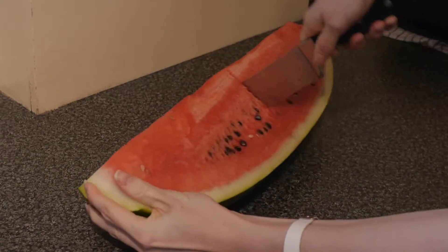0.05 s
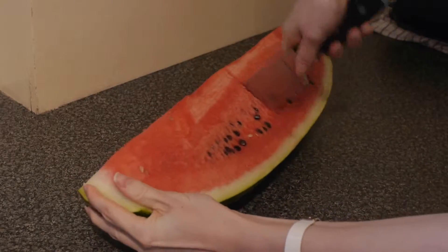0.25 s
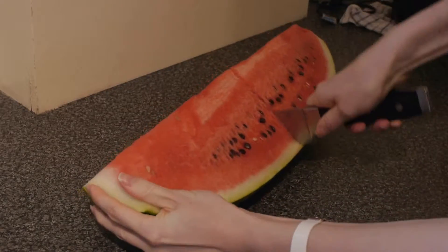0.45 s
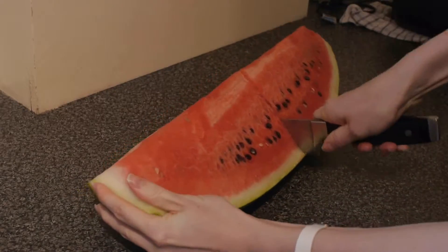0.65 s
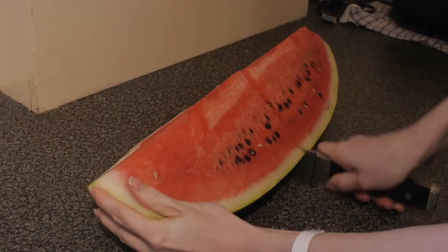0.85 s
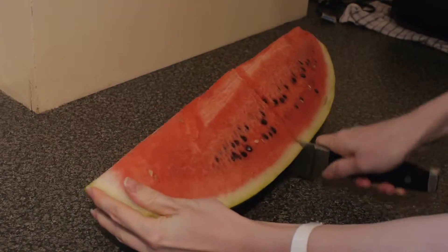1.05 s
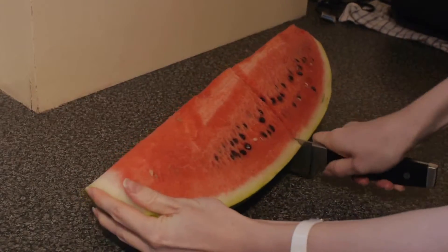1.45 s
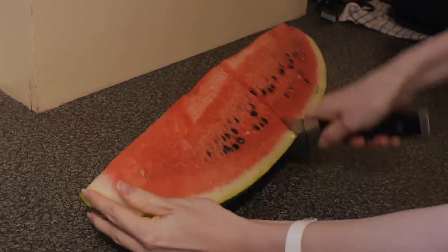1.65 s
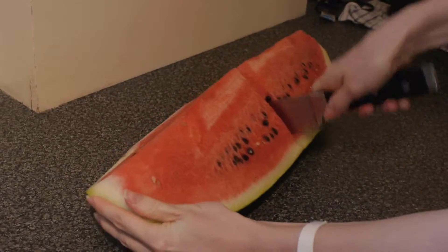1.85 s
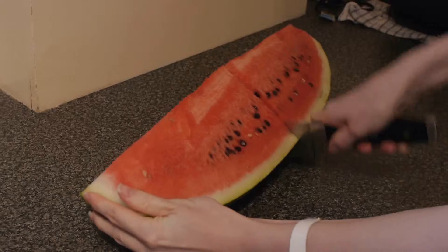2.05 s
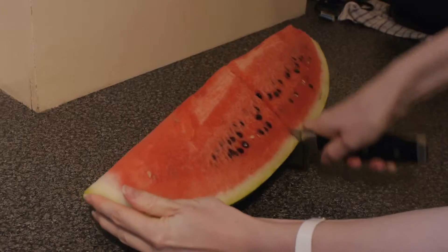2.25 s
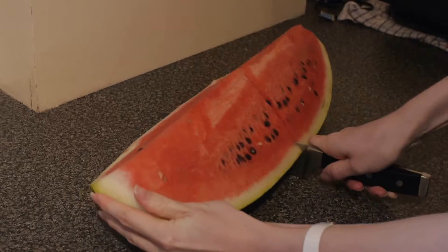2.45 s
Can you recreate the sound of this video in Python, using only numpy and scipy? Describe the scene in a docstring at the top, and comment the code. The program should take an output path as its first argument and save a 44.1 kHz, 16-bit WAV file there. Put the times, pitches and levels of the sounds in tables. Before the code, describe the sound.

Knife slicing a watermelon wedge, its rind cracking with hollow knocks in an echoing room.

```python
"""In a bare, echoing room, a big knife is worked through a watermelon wedge on the carpet.
Cells of the wet flesh burst under the blade, and their impulses merge into short hisses.
The rind snaps, with one faint wall echo just after the loudest snaps. Each time the blade breaks
through, it excites the wedge's damped modes: a hollow thud that rings on in the room."""
import sys
import numpy as np
from scipy import signal
from scipy.fft import rfft, irfft
from scipy.io import wavfile
from scipy.ndimage import uniform_filter1d

SR = 44100
rng = np.random.default_rng(int(sys.argv[2]) if len(sys.argv) > 2 else 0)


def store_pcm(level_fs):
    """Save levels as 16-bit WAV."""
    pcm = np.round(np.clip(level_fs, -1, 1) * 32767).astype(np.int16)
    wavfile.write(sys.argv[1], SR, np.atleast_2d(pcm).T)


N = 110250
HZ = np.maximum(np.fft.rfftfreq(N, 1 / SR), 1)
T = np.arange(N) / SR

# air noise: (frequency [Hz], level [dB])
AIR_SPECTRUM = [(25, -14.5), (60, -15.5), (160, -14), (235, 3.5), (310, -7), (550, 4), (1000, 1),
                (1800, -1), (3500, -3), (8000, -4.5), (15000, -16)]
# blade strokes: (peak time [s], rise [s], fall [s], level [dB], tilt [dB/octave])
STROKES = [(.02, 0.035, 0.011, -56, 1), (0.07, 0.015, 0.0065, -43, -0.6), (.125, 0.03, 0.023, -56, 3),
           (0.19, 0.021, 0.0091, -35.5, -0.5), (0.404, 0.055, 0.033, -36, -1),
           (0.543, 0.018, 0.0088, -45, 0.5), (.635, 0.08, .035, -57, -5.5), (.708, .014, 0.023, -31, -0.2),
           (.745, 0.034, 0.039, -34, 1), (0.826, 0.013, 0.03, -25, 1.5), (1.029, 0.057, 0.048, -83, 11),
           (1.161, .02, 0.024, -90, 5), (1.241, 0.049, 0.024, -60.5, 3.5), (1.389, 0.046, 0.012, -52, 1.5),
           (1.612, 0.0096, 0.013, -49.5, 1), (1.64, .015, 0.013, -48.5, 1.5),
           (1.745, 0.048, 0.011, -54.5, 3), (1.855, 0.01, 0.013, -55, 15.5),
           (1.944, 0.0094, 0.018, -45.5, 1.8), (1.98, 0.015, 0.0092, -45, 0.5),
           (2.02, 0.021, 0.057, -50.5, 3), (2.062, 0.011, 0.0063, -32.5, 1.1),
           (2.213, 0.021, 0.013, -43.5, 1.5), (2.253, 0.011, 0.02, -42, .3),
           (2.365, 0.056, 0.016, -56, -5.5), (2.465, 0.026, 0.015, -56, 2)]
# wet flesh parting: (frequency [Hz], level [dB])
FLESH_SPECTRUM = [(40, -54.5), (110, -18.5), (190, -13), (260, -3), (500, 2.5), (800, -0.5), (1150, -1.5),
                  (1800, -2.5), (3000, -4), (4500, -3), (7000, -8.5), (11000, -7), (15000, -15)]
# rind snaps, and one faint wall echo just after the loudest: (time [s], level [dB], tilt [dB/octave])
SNAPS_AND_ECHO = [(0.181, -27, 14), (0.211, -3, -19), (0.2145, 7, 1.5), (0.2183, 9, 7.5), (0.2208, 2, 5.5),
                  (0.2312, -44, 5), (0.7108, -5.5, 9), (.7873, -12.5, -10), (1.6414, -33.5, -1),
                  (1.9385, -25, -4.5), (2.0421, -25, -5), (2.0534, -14, -5), (2.0641, -18, -7),
                  (2.4587, -30, 8)]
# colour of a snap: (frequency [Hz], level [dB])
RIND_SPECTRUM = [(100, -23.5), (500, -20), (1500, -13), (2900, -8.5), (4200, -2), (5500, 4), (7200, 4.5),
                 (9500, 0), (11500, -2.5), (13500, -5.5), (15500, -19.5)]
# blows to the wedge: (time [s], level [dB], boom [Hz], boom gain [dB], cutoff [Hz], bass gain [dB])
THUDS = [(.2142, 5, 506, 9, 1880, -5.5), (.2232, -13.5, 452, 13, 1250, -6), (0.867, 2.5, 520, 8, 1940, -4),
         (.8755, 6, 494, 3, 1530, -9.5), (1.6932, -21, 510, 5.5, 2070, -14),
         (1.7028, -16, 520, 11, 1050, -13), (1.737, -26, 503, 3, 1880, -20),
         (2.0641, 6.5, 772, 8.5, 2560, -11.5)]
# damped modes of the wedge: (frequency [Hz], bandwidth [Hz], level [dB])
WEDGE_MODES = [(278.8, 20.3, 3), (431, 84, -4.5), (538, 123, 2), (777, 150, 0.5), (984, 71, 1),
               (1418, 72, 0), (1728, 600, -2), (2025, 160, -9.5), (2360, 160, -5), (3900, 314, 13.5)]
# reverberation time: (frequency [Hz], T60 [s])
ROOM_T60 = [(150, 0.76), (400, 0.36), (750, 0.5), (1200, 0.4), (2800, 0.4), (7000, 0.43), (14000, 0.3)]
# diffuse tail: (frequency [Hz], level [dB])
TAIL_SPECTRUM = [(100, -12.5), (400, 3.5), (1000, 4.5), (3000, 5), (8000, 3), (15000, 1)]
# early reflections: (delay [s], gain [ratio])
REFLECTIONS = [(.0013, .3), (.0023, .3), (.006, .3), (.0093, .75), (.0175, .25), (.0255, .3), (.038, .3),
               (.0495, .3)]
# standing waves of the room: (frequency [Hz], level [dB])
ROOM_MODES = [(261, -62), (432, -69.5), (537, -64), (590, -56), (720, -59.5), (749, -50.5), (826, -56),
              (1033, -56), (1379, -64), (1873, -72.5)]
# side relative to mid in diffuse sound: (frequency [Hz], level [dB])
STEREO_WIDTH = [(40, 0), (70, -20), (130, -2), (260, -23.5), (500, -17), (1000, -10), (2000, -2),
                (4000, -1), (12000, 0)]


def amp(db):
    """Amplitude ratio of a level in decibels."""
    return 10 ** (np.asarray(db) / 20)


def curve(points, hz=HZ):
    """Interpolation on a logarithmic frequency axis."""
    f, value = np.transpose(points)
    return np.interp(np.log(hz + 1), np.log(f), value)


def tilted(spectrum, db_per_octave, from_hz=880):
    """Spectral tilt: a gain curve with an added slope above from_hz."""
    return amp(curve(spectrum) + db_per_octave * np.log2(np.maximum(HZ, from_hz)))


def unit(x):
    """Normalisation to an rms of 1."""
    return x / np.sqrt(np.mean(abs(x) ** 2) + 1e-20)


def add(mix, time, sound):
    """Superposition of a sound on the mix, from the given time."""
    part = mix[max(round(time * SR), 0):][:len(sound)]
    part += sound[:len(part)]


def ring(gain, size=4096):
    """Minimum phase: folding the cepstrum gives a causal impulse response of this spectral shape."""
    log_gain = np.log(np.maximum(unit(gain), 1e-5))
    cepstrum = irfft(log_gain, N)
    cepstrum[1:N // 2] *= 2
    cepstrum[N // 2 + 1:] = 0
    return irfft(np.exp(rfft(cepstrum)), N)[:size]


def whiten(spectra, band_hz):
    """Whitening: division by the rms of the surrounding band evens out the colour."""
    power = uniform_filter1d(abs(spectra) ** 2, int(band_hz * N / SR), axis=-1)
    return spectra / np.sqrt(abs(power) + 1e-20)


def diffuse_pair(mid, side):
    """Partial coherence: two independent spectra mix into the left and right of a diffuse field."""
    width = amp(curve(STEREO_WIDTH))
    return np.array([mid + width * side, mid - width * side]) / np.sqrt(1 + width ** 2)


def room_tone(level_db=-62.5):
    """Stationary noise: the faint, diffuse sound of the air."""
    noise = diffuse_pair(*rfft(rng.standard_normal((2, N))))
    return amp(level_db) * unit(irfft(noise * amp(curve(AIR_SPECTRUM)), N))


def flesh_hiss(cells_per_s=9000, spread_db=4):
    """Shot noise: cells burst densely under the blade while each stroke swells and fades."""
    out = np.zeros(N)
    for peak, rise, fall, db, tilt in STROKES:
        sizes = amp(spread_db * np.minimum(rng.exponential(1, N), 4))
        signs = rng.choice([-1, 1], N)
        bursts = unit(sizes * signs * (rng.random(N) < cells_per_s / SR))
        swell = np.exp(-.5 * ((T - peak) / np.where(T < peak, rise, fall)) ** 2)
        colour = ring(tilted(FLESH_SPECTRUM, tilt))
        out += amp(db - 7) * signal.oaconvolve(bursts * swell, colour)[:N]
    return out


def rind_snaps_and_echo(places=3, decay_s=.0004, size=512):
    """Broadband transients: the rind snaps at a few places in turn; one faint burst is a wall echo."""
    out = np.zeros((places, N))
    envelope = np.exp(-T[:size] / decay_s)
    for k, (time, db, tilt) in enumerate(SNAPS_AND_ECHO):
        burst = rng.standard_normal(size)
        for _ in range(3):  # shorten the burst, then flatten its spectrum
            phase = np.angle(rfft(burst * envelope))
            burst = irfft(np.exp(1j * phase))
        colour = ring(tilted(RIND_SPECTRUM, tilt) / (1 + (250 / HZ) ** 2))  # bass cut
        add(out[k % places], time, amp(db) * np.convolve(burst[:size // 2], colour))
    return out


def wedge_thuds(low_cut_hz=151, boom_octaves=.23, cutoff_order=9.8, push_period_s=.018):
    """Modal resonance: each blow rings the wedge, with its own bandwidth and the boom of its place."""
    out = np.zeros(N)
    power = sum(amp(db) ** 2 / (1 + (2 * (HZ - hz) / width) ** 2) for hz, width, db in WEDGE_MODES)
    body = np.sqrt(power / (1 + (low_cut_hz / HZ) ** 4)) + amp(-55)
    body *= amp(-7 * np.exp(-((HZ - 1193) / 76) ** 2))  # dip between lower and upper modes
    for time, db, boom_hz, boom_db, cutoff_hz, bass_db in THUDS:
        boom = amp(boom_db * np.exp(-.5 * (np.log2(HZ / boom_hz) / boom_octaves) ** 2))
        bass_shelf = amp(bass_db / (1 + (HZ / 194) ** 4))
        lowpass = 1 / np.sqrt(1 + (HZ / cutoff_hz) ** (2 * cutoff_order))
        add(out, time, amp(db) * ring(body * boom * bass_shelf * lowpass))
    # the first break pushes the wedge against the floor
    half_cycles = 2 * T / push_period_s
    push = np.sin(np.pi * half_cycles) * np.exp(-half_cycles)
    add(out, .215, amp(-48.5) * push)
    return out


def room(source, build_s=.0013, wall_cutoff_hz=4730, stereo_lag_s=14e-6):
    """Reverberation: early reflections, a diffuse tail and standing waves join the direct sound."""
    bands, times, noise = signal.stft(rng.choice([-1., 1.], (2, N)), SR, nperseg=256)
    decay = amp(-60 * times / curve(ROOM_T60, bands)[:, None])
    tails = signal.istft(noise * decay, SR, nperseg=256)[1][:, :N]
    tails *= 1 - np.exp(-T / build_s)
    diffuse = diffuse_pair(*whiten(rfft(tails), band_hz=97)) * amp(curve(TAIL_SPECTRUM))
    early = sum(gain * np.exp(-2j * np.pi * HZ * delay) for delay, gain in REFLECTIONS)
    early /= (1 + 1j * HZ / wall_cutoff_hz) ** 2
    standing = sum(amp(db - 60 * T / curve(ROOM_T60, hz)) * np.sin(2 * np.pi * hz * T)
                   for hz, db in ROOM_MODES)
    response = irfft(1 + early + diffuse, N) + standing
    lag = np.exp(np.array([[-1j], [1j]]) * np.pi * HZ * stereo_lag_s)  # left trails right
    direct = irfft(rfft(source) * lag, N)
    return signal.fftconvolve(direct, response[:, :SR], axes=1)[:, :N]


def scene():
    """Superposition: each place on the wedge excites its own diffuse tail, over the room tone."""
    sources = [flesh_hiss(), wedge_thuds(), *rind_snaps_and_echo()]
    return sum(room(source) for source in sources) + room_tone()


def record(dry, cutoff_hz=15950):
    """Band limiting: a linear-phase low-pass removes the highest treble."""
    lowpass = signal.firwin(255, cutoff_hz, window=("kaiser", 9), fs=SR)
    return signal.oaconvolve(dry, lowpass[None], "same")


dry = scene()
out = record(dry)
store_pcm(out)
```